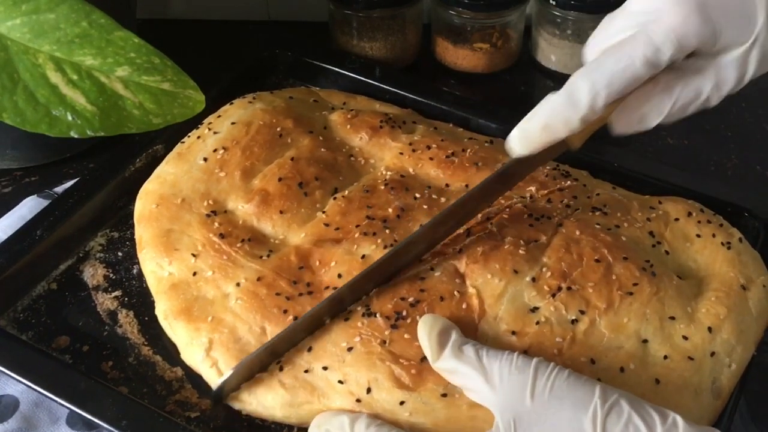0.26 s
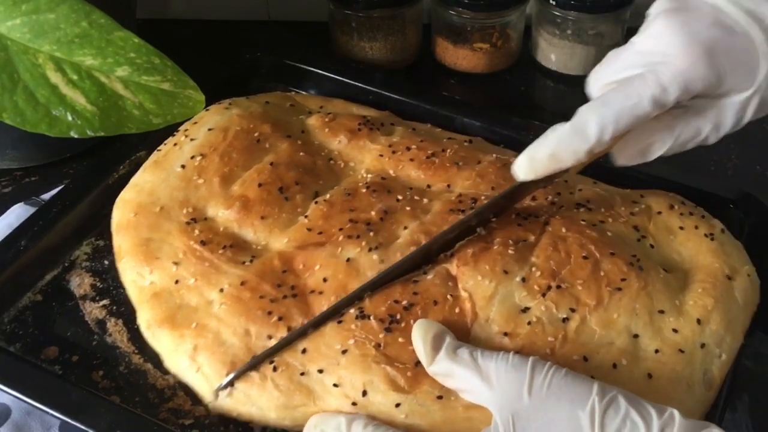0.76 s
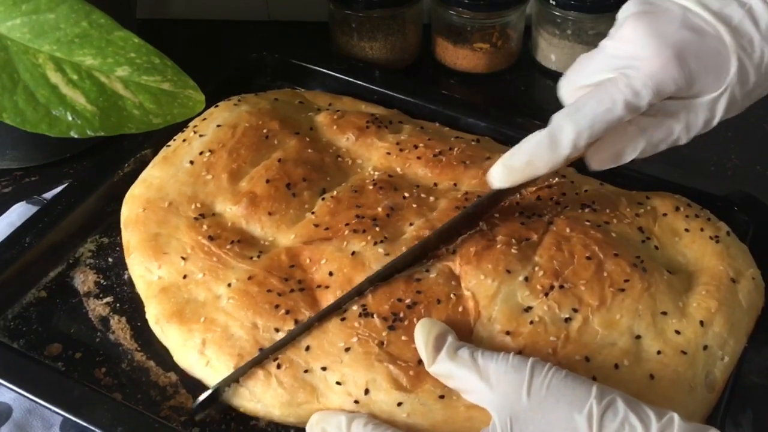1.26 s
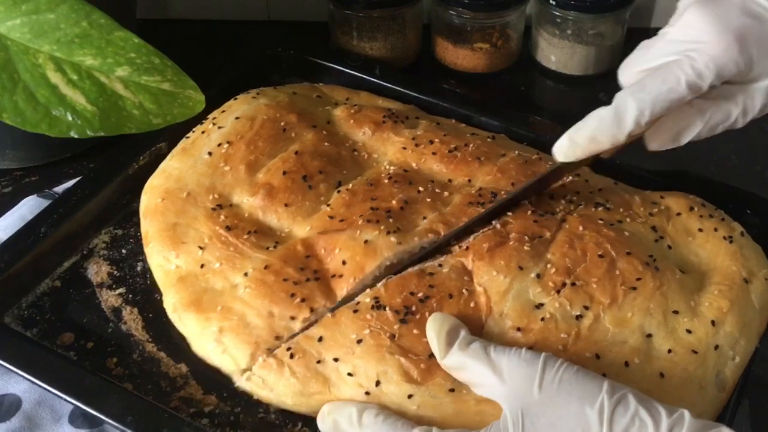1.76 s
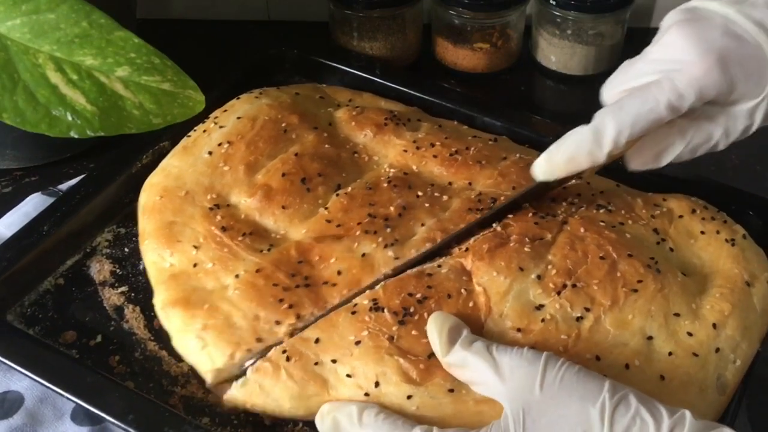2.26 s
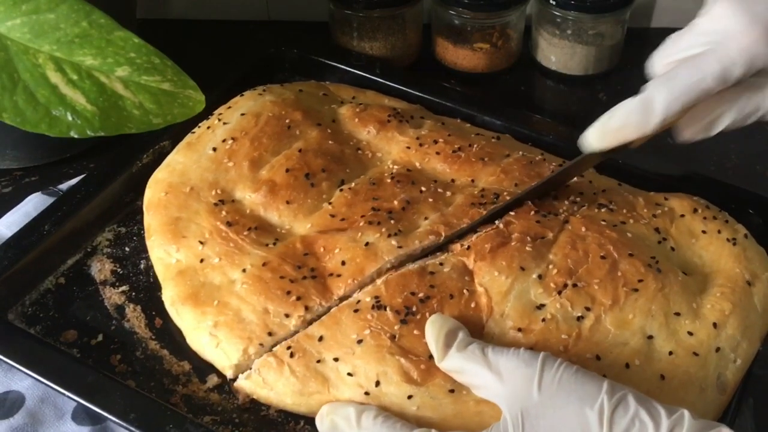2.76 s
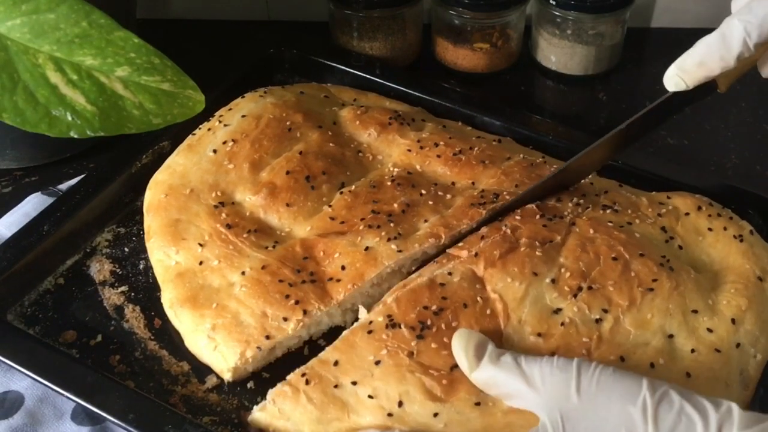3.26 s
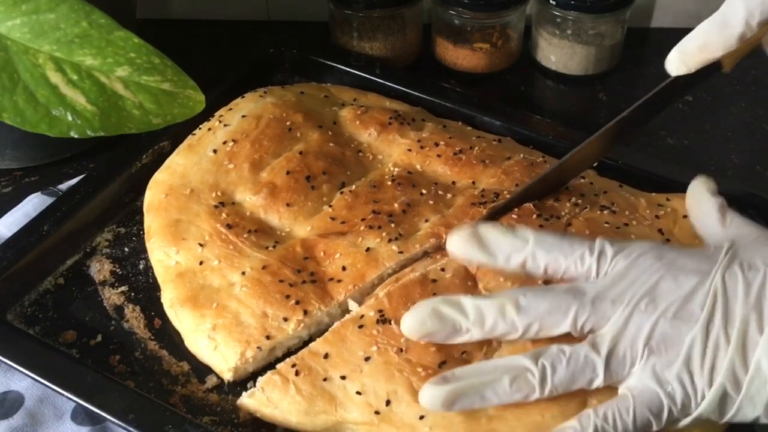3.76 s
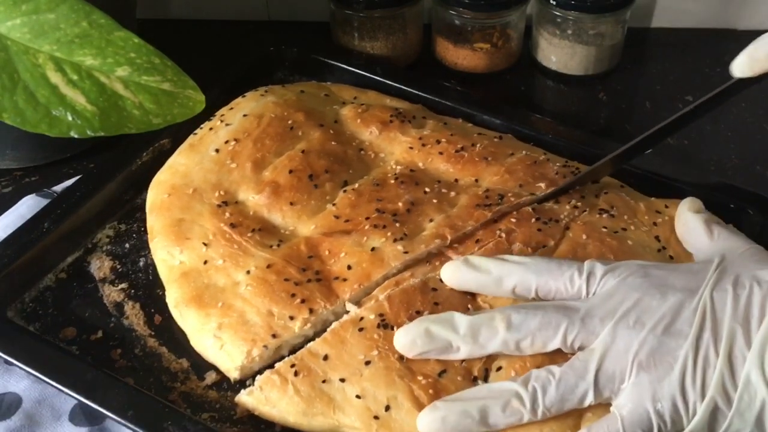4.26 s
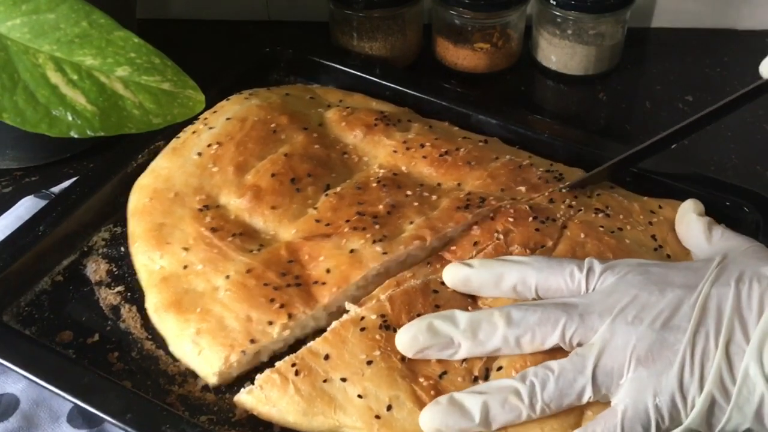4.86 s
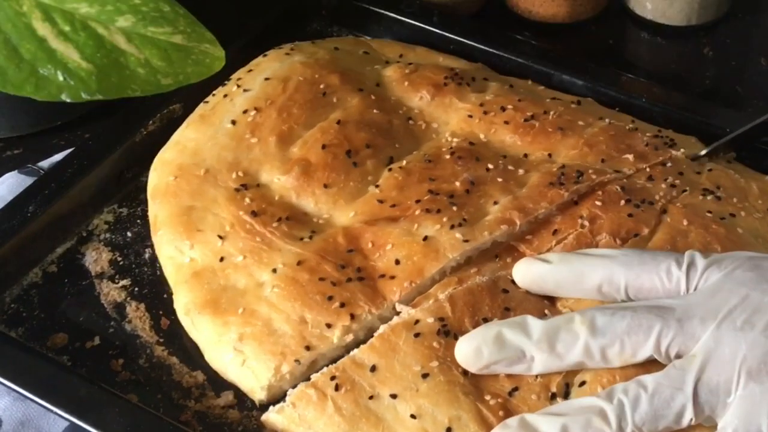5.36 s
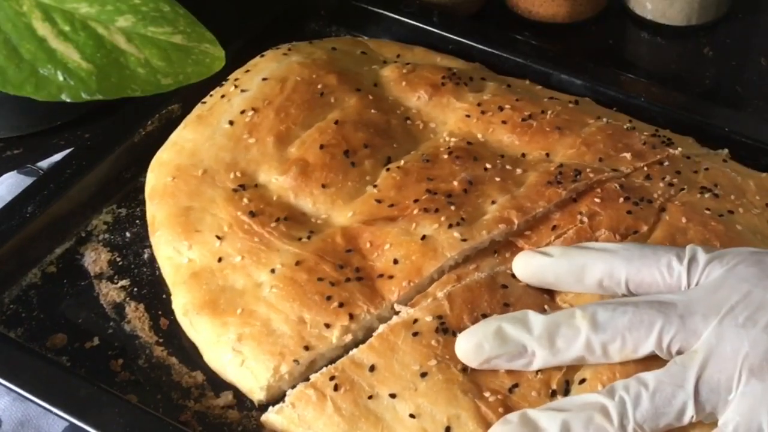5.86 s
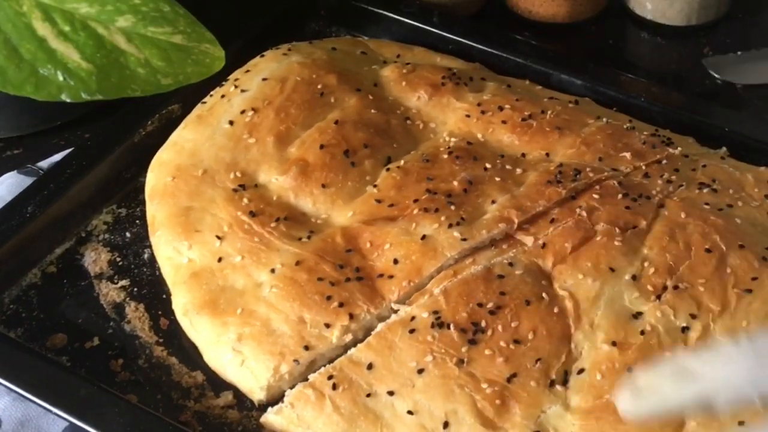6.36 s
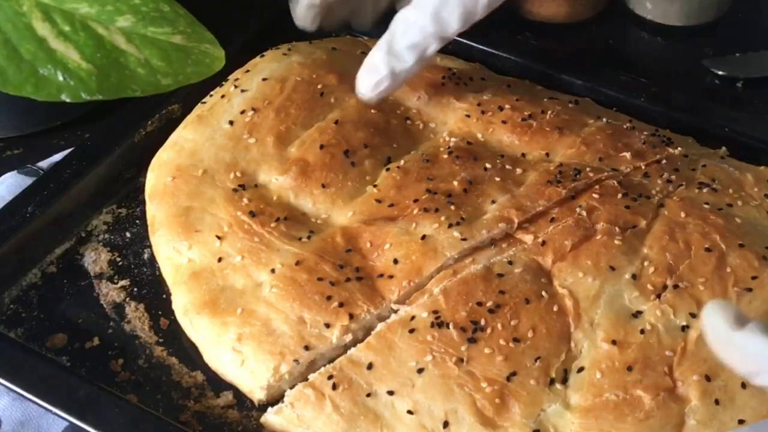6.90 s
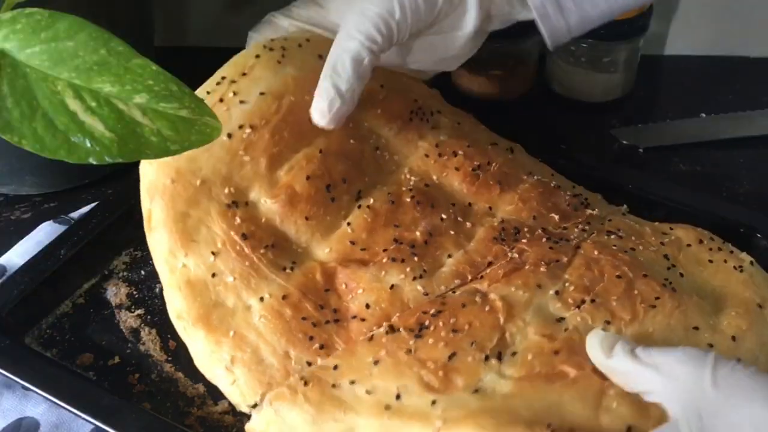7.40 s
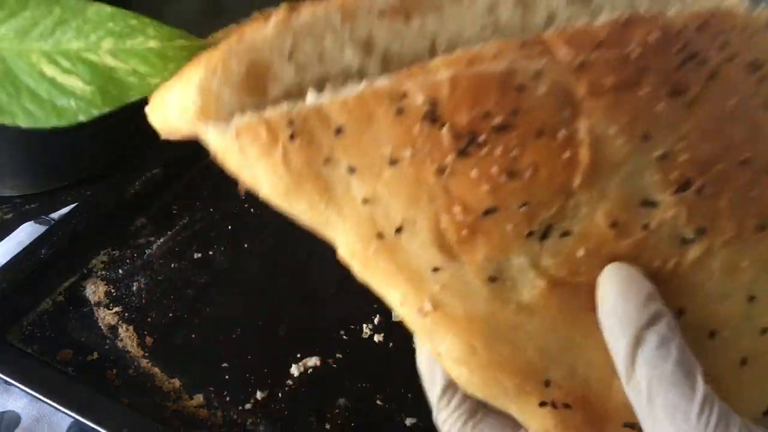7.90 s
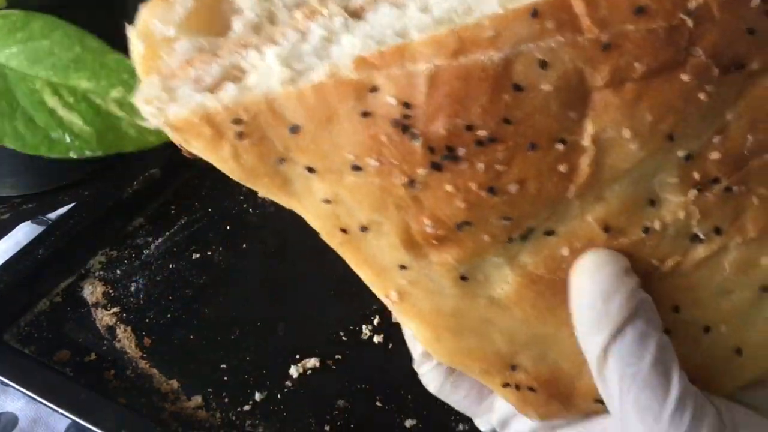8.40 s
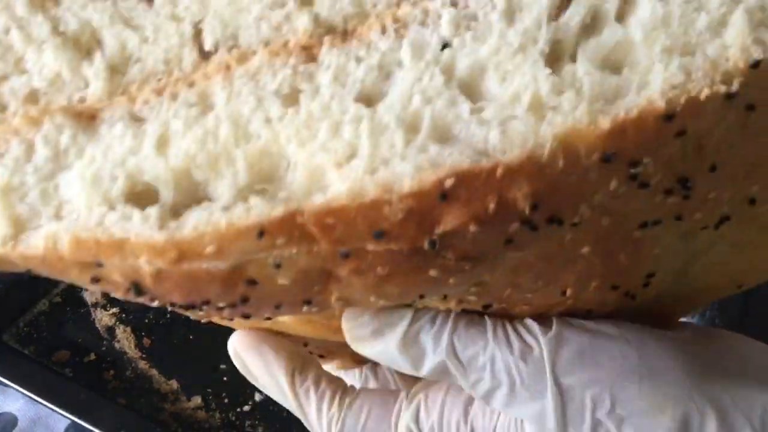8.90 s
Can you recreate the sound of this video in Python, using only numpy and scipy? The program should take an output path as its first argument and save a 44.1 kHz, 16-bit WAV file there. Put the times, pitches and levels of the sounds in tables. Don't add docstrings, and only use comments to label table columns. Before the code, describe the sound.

Close in a quiet kitchen, a serrated knife rasps softly through crusty flatbread with small crust snaps. Two loud cracks come as the blade breaks through, then a louder one as the thick rim gives. Its teeth chatter rapidly on the metal tray, the knife clatters onto the counter with a short steel ring, and only faint crumb and glove ticks remain over a low fridge hum.

```python
import sys
import numpy as np
from scipy import signal
from scipy.fft import rfft, irfft, next_fast_len
from scipy.io import wavfile
from scipy.ndimage import uniform_filter1d

SR = 44100
rng = np.random.default_rng(int(sys.argv[2]) if len(sys.argv) > 2 else 0)


def to_wav(sig):
    pcm = np.clip(np.atleast_2d(sig), -1, 1) * 32767
    pcm = np.round(pcm).astype(np.int16)
    wavfile.write(sys.argv[1], SR, pcm.T)


def undo_db(level):
    steps = np.asarray(level, float) / 20
    return 10 ** steps


N = 403074

# pitch_hz, density_db
AIR_COLOUR = [(21, -35), (35, 5), (70, -4.5), (98, -20.5), (123, -5), (151, -10), (245, -16.5),
              (309, -11.5), (443, -21.5), (650, -15.5), (840, -19.5), (1440, -19.5), (2950, -33),
              (12700, -45.5), (16000, -48)]
AIR_DB = -58
# time_s, level_db
ROOM_WASH = [(0, -8.5), (2.5, -5), (3.5, -2.5), (6, 2.5), (7.8, -1.5), (8.1, -3.5)]
# peak_s, swell_s, ease_s, level_db
MOTOR_THROBS = [(.3, .5, 0.45, -51.5), (1.55, 0.5, 0.99, -50), (2.3, 0.16, 0.26, -50),
                (2.8, 0.29, 0.29, -47), (3.55, 0.44, 0.29, -47.5), (4.1, 0.23, 0.19, -43),
                (4.65, 0.21, 0.4, -42), (5.3, 0.17, 0.2, -46), (6.85, 0.22, 0.23, -53)]
MOTOR_HZ, MOTOR_REST_DB = 66.3, -62.5
# time_s, level_db
TABLE_RUMBLE = [(0, -61), (4.3, -58), (4.7, -50), (5.2, -61), (6.1, -50), (7, -58), (8, -49.5), (9.14, -55)]
TABLE_HZ = 55.7
HUM_OVERTONES_DB = [-12, -28, -18]
HUM_HZ, HUM_DB = 100.6, -54.5

# pitch_hz, t60_s
ROOM_DECAY = [(300, 0.24), (1000, 0.48), (3000, 0.27), (8000, 0.23), (15000, 0.3)]
ROOM_TURN_S = 0.11
# start_s, level_db
AFTERMATH = [
    (2.0885, -31.5),
    (2.493, -36.5),
    (4.254, -25.5),
]
# pitch_hz, density_db
AFTERMATH_COLOUR = [(400, -12), (900, -5), (2200, -2), (3400, -5), (4500, -16.5), (8000, -22), (15000, -39)]
EARLY_T60_S, LATE_T60_S, LATE_DB = 0.066, 0.51, -16

# start_s, peak_db, pitch_hz
TICKS = [(0.113, -57, 12500), (.725, -60, 13000), (1.178, -40.5, 3600), (2.031, -51.5, 3680),
         (2.204, -52, 4000), (2.232, -44, 13000), (2.241, -41.5, 6740), (1.287, -51, 9000),
         (1.501, -51, 9030), (1.8682, -44.5, 9000), (2.381, -43, 3100), (2.4658, -48, 4350),
         (2.5755, -58, 3180), (2.732, -55, 3620), (2.7716, -46, 3630), (3.3974, -57, 5180),
         (4.834, -40, 3110), (2.2877, -49, 3090), (3.0087, -52, 4340), (3.359, -56, 3870),
         (3.482, -46, 3730), (3.529, -42.5, 3060), (4.0495, -56, 3110), (4.816, -45, 3920),
         (6.799, -44, 5400), (6.964, -41, 4440), (7.0393, -40.5, 4300), (7.17, -43, 12900),
              (7.218, -59, 13100), (7.3345, -71, 3450), (7.35, -46, 12900), (7.3695, -54, 6200),
              (7.422, -44.5, 3100), (7.478, -47, 6070), (7.534, -52, 8890), (7.699, -52, 7000),
              (7.7167, -40.5, 4240), (7.889, -54, 4100), (8.0463, -54, 13000), (8.085, -49.5, 11200),
              (8.123, -54, 12000), (8.491, -47, 12000), (8.525, -49, 12000), (8.5866, -52, 5500),
              (8.9435, -44, 12800), (7.6181, -59, 3000), (7.675, -60, 3280), (7.825, -59, 5000),
              (8.0092, -56, 3000), (8.6118, -57.5, 4420), (8.644, -47.5, 3560), (8.8145, -52, 11000),
              (8.9196, -60, 8900), (9.016, -59, 12000), (6.075, -59, 3500)]
# pitch_hz, density_db
SCUFF_COLOUR = [(1000, -29), (3000, -0.5), (6000, 2.5), (10500, 1.5), (14000, 2)]

# start_s, peak_db, strongest_hz
BOUNCES = [(6.115, -28, 2070), (6.12, -31.5, 3400), (6.1418, -35, 3430), (6.146, -41, 6800),
           (6.163, -38, 6800), (6.17, -44, 3420), (6.186, -41, 6800), (6.2044, -46.5, 3430),
           (6.2194, -43.5, 3430), (6.2654, -48, 4000), (6.28, -43, 12000), (6.3386, -15, 2070),
           (6.3402, -14.5, 13900), (6.349, -17.5, 5940), (6.351, -24.5, 2070), (6.48, -34.5, 5870),
           (6.5079, -30, 5920), (6.514, -35, 4290), (6.529, -36.5, 3750), (6.534, -31, 4230),
           (6.544, -29.5, 4960), (6.5573, -35, 3950), (6.564, -37, 2100), (6.5751, -31.5, 5900),
           (6.6094, -38.5, 5450), (6.615, -42, 12000), (6.6554, -45, 14000), (6.6697, -46, 13400)]
# pitch_hz, width_hz, level_db
BLADE_MODES = [(1500, 110, -9), (2070, 50, -5), (2660, 55, -4), (3430, 58, -4), (4240, 90, -9),
               (5080, 110, -4), (5860, 86, -5.5), (6820, 100, -6), (8800, 150, -8), (10000, 160, -6),
               (11840, 170, -1), (13200, 300, 1), (14200, 300, 0), (15000, 300, -2)]
BLADE_SPOT_DB = 2.5
# start_s, pitch_hz, level_db, t60_s
SINGING = [(1.187, 4500, -50, 0.094), (1.187, 1750, -47, .05), (1.187, 3630, -50, .04),
           (1.545, 1750, -50, .05), (6.145, 2680, -46.5, .06), (2.108, 3190, -45, 0.27),
           (2.51, 3200, -52, .12), (5.728, 6450, -41, .08), (6.116, 3440, -46, 0.08),
           (6.116, 2645, -43, 0.092), (6.116, 1550, -44, 0.06), (6.116, 2050, -51, 0.034),
           (6.341, 2107, -45, 0.22), (6.341, 4300, -52, 0.28), (6.35, 5850, -43, 0.17),
           (6.53, 2070, -47, 0.14), (6.566, 2070, -47, 0.078)]
SINGING_BEAT_HZ, SINGING_PAIR_GAIN = 38, 0.4

# start_s, peak_db, crack_db, strongest_hz
SNAPS = [(0.0034, -43, -13, 1740), (1.1857, -29.5, -15, 2430), (1.1915, -40, -15, 1430),
         (1.5312, -38.5, -7, 2350), (1.5414, -39, -19, 1750), (1.549, -46, -24, 1750),
         (1.9165, -42, -17, 2450), (1.926, -37, -29, 2450), (1.936, -35.5, -26, 2440),
         (1.946, -51, -30, 1800), (1.9689, -43, -22, 2420), (3.7954, -46, -16, 2630),
         (4.8454, -35.5, -21, 1750), (2.468, -40, -25, 3030), (2.2406, -44.5, -25, 1750),
         (7.6982, -52, -19, 1270)]
SNAP_SLIP_MS = 8.3
# start_s, peak_db, crack_db, strongest_hz, slip_ms
BREAKS = [
    (2.0876, -12.5, -20.5, 3190, 1.8),
    (2.4918, -14, -19, 2100, 1.7),
]
# start_s, peak_db, crack_db, strongest_hz, slip_ms
RIM_BREAK = [
    (4.2528, -9.5, -14, 2130, 3),
]
# start_s, peak_db, crack_db, strongest_hz, slip_ms
CHATTER = [(4.975, -10.5, -11.5, 2290, 3.4), (4.9795, -15, -32, 2400, 5.2), (4.9937, -10.5, -23, 2523, 4.9),
           (4.999, -17, -26.5, 3300, 5), (5.0116, -13, -20, 2560, 6.5), (5.0298, -12.5, -20, 2600, 6.9),
           (5.0486, -11, -21, 2654, 6), (5.1305, -30, -37.5, 2570, 7), (5.1388, -18.5, -18, 1500, 3.8),
           (5.3169, -11, -20, 3210, 5), (5.3278, -9, -29, 2580, 7.5), (5.3462, -11.5, -23, 2650, 5),
           (5.3575, -19.5, -34.5, 2590, 5), (5.3702, -9.5, -22, 2600, 5), (5.3905, -24.5, -36.5, 2000, 3),
           (5.3979, -12, -16.5, 3100, 5.9), (5.4115, -17.5, -31, 2700, 2.3), (5.4395, -18, -20, 1500, 3.4),
           (5.4912, -21.5, -21, 2300, 2.63), (5.5005, -31, -31.5, 2600, 5.8), (5.5114, -13, -21, 2300, 4.4),
           (5.5224, -19, -20.5, 2260, 8), (5.5407, -33.5, -21.5, 1100, 6), (5.6065, -18, -29, 3090, 4),
           (5.631, -16, -36.5, 1330, 3.2), (5.6378, -10, -16.5, 3100, 4.88), (5.651, -16, -41, 2550, 11),
           (5.661, -6, -17, 2650, 5.7), (5.6815, -11.5, -23.5, 3120, 6.3), (5.7005, -11, -15, 1370, 5),
           (5.711, -20.5, -28, 1370, 12), (5.7266, -18.5, -27, 3100, 6), (5.733, -19, -16, 3100, 14),
           (5.7619, -17.5, -17.5, 2900, 2.5)]
# pitch_hz, width_hz, level_db
CRUST_MODES = [(1002, 160, -16), (1270, 180, 2), (1750, 110, 0), (1900, 62, 1.5), (2100, 130, -1),
               (2440, 120, 5), (2570, 62, -0.5), (3110, 140, -6.5), (3620, 120, -5.5), (3860, 180, -10),
               (4500, 110, -10.5), (5520, 150, -17), (2800, 3600, 4.5)]
# pitch_hz, width_hz, level_db
BREAK_MODES = [(1294, 60, -10.5), (1750, 240, -6), (2100, 96, 1), (2542, 81, 4), (3190, 69, -1),
               (3650, 110, -8), (3870, 120, -9), (4360, 200, -14), (4540, 180, -11), (4890, 170, -11),
               (5380, 110, -10), (650, 87, -12.5), (2600, 2100, 5)]
# pitch_hz, width_hz, level_db
RIM_MODES = [(770, 83, -9), (1400, 75, 1), (1100, 73, -12), (2130, 100, 8.5), (2560, 100, 1),
             (2950, 84, -4.5), (3190, 120, 6), (1750, 250, 0), (3920, 130, -3), (4290, 150, -12),
             (5070, 150, -8), (5530, 140, -6), (2600, 2500, 10)]
# pitch_hz, width_hz, level_db
TRAY_MODES = [(1174, 65, -3.5), (1384, 62, -1), (1772, 223, 7.5), (2160, 230, 2), (2237, 55, -3),
              (2560, 105, 5.5), (2920, 990, 10.5), (3097, 110, 5.5), (3750, 130, -4), (4120, 270, 0),
              (4500, 530, -1.5), (5150, 260, -5.5), (6430, 180, -18.5), (2600, 3600, 0)]
# pitch_hz, width_hz, level_db
LOAF_MODES = [(382, 33, -4.5), (652, 65, 2.5), (906, 140, -0.5)]
# pitch_hz, width_hz, level_db
TRAY_LOW_MODES = [(371, 41, -1.5), (930, 215, 4)]
# pitch_hz, density_db
CRACK_COLOUR = [(2500, -9), (4500, -3), (7000, -5), (9500, -7.5), (11000, -12), (14500, -15)]
SLIP_BUILD = 0.16
SLIP_SQUARENESS = 2.4
PRESS_DETUNE = 0.012

# peak_s, swell_s, ease_s, effort_db, coarse_grit_db
STROKES = [(.115, 0.027, 0.043, -67, 2), (.152, .015, 0.018, -69.5, 7), (.415, 0.022, .03, -70, -12),
           (.95, .04, 0.031, -83, -10), (1.69, 0.059, 0.053, -63.5, 4), (.29, 0.062, 0.081, -65, -15),
           (.47, 0.043, 0.063, -57, -10), (.6, 0.059, 0.11, -58.5, -10), (.79, 0.077, 0.069, -59.5, -5),
           (1.13, 0.069, 0.091, -65.5, -17), (1.31, 0.081, 0.13, -64, 2.5),
           (1.505, 0.076, 0.095, -63.5, -6), (1.61, 0.05, 0.093, -63.5, -4),
           (1.81, 0.036, 0.071, -68.5, -16), (1.875, 0.056, 0.053, -61, -6), (1.92, 0.042, 0.043, -53, -3),
           (1.99, 0.033, 0.046, -59.5, -4), (2.03, 0.016, 0.057, -40.5, 0.5), (2.3, 0.027, 0.024, -57.5, 6),
           (2.42, 0.079, 0.11, -53, 2.5), (2.64, 0.14, 0.058, -58, 2), (2.84, 0.13, 0.086, -51, -1.5),
           (3.01, 0.012, 0.061, -58, 3),
           (3.51, 0.055, 0.1, -61.5, -0.5), (3.801, 0.037, 0.023, -61.5, 13.5), (4.06, 0.017, 0.054, -69, 12),
        (4.19, 0.054, 0.04, -70, 6.5), (4.42, 0.089, 0.08, -61.5, 4), (4.54, 0.064, 0.056, -62, 5),
        (4.815, 0.008, 0.026, -58.5, 8.5), (4.85, 0.029, 0.041, -55, 6), (4.96, 0.054, 0.054, -63.5, 7),
        (5.16, 0.018, 0.062, -56.5, 11.5), (5.235, 0.034, .04, -76, 22.5),
        (5.29, 0.038, 0.031, -59.5, 16.5), (5.73, 0.053, 0.032, -40.5, -3), (5.82, 0.031, 0.2, -69, 16),
        (6.98, 0.033, 0.05, -58, 0), (7.41, 0.022, 0.045, -66, -16), (7.46, 0.059, 0.09, -58.5, -0.5),
        (7.7, 0.026, 0.031, -72, 9), (8.68, 0.13, 0.15, -60.5, -2.5), (8.955, .012, 0.032, -70, -3),
        (9.0, .5, .5, -80, -1), (8.25, .25, .25, -71, -5.5), (8.052, 0.0065, 0.025, -61, -12),
        (8.128, .006, 0.025, -66, -10), (8.495, 0.0068, .03, -58, -3), (6.17, .06, 0.1, -64.5, 6)]
STROKE_ENDS_DB, STROKE_ROUNDNESS = -23.5, 1.9
# time_s, level_db
WHISTLE = [(0, -10), (.45, 0), (.65, -17), (.8, -25), (.95, 1), (1.13, -2), (1.25, -18), (1.5, -38),
           (1.8, -38.5)]
WHISTLE_HZ, WHISTLE_WIDTH_HZ, WHISTLE_REST_DB = 12560, 90, -85
# pitch_hz, density_db
FIZZ_COLOUR = [(1500, -19), (3000, 1.5), (4500, 1), (6500, -0.5), (9000, 0), (10500, -5), (12000, -4.5),
               (15500, -7.5)]
# pitch_hz, density_db
GRIT_COLOUR = [(500, -19), (900, 1), (1500, 1), (2500, 1), (3800, -7.5), (5000, -13.5), (8000, -27.5)]

# centre_s, half_width_s, deepest_db
SCENE_CHANGES = [
    (5.199, 0.028, -32),
    (7.034, 0.035, -41),
    (7.865, 0.032, -18),
]
# pitch_hz, level_db
MICROPHONE = [(25, -45), (45, -4), (60, 0), (9800, 0), (10500, -2.5), (11200, 0), (15700, 0), (15950, -24),
              (16600, -30), (16750, -70)]


def evened(x):
    return x / np.sqrt(np.mean(x ** 2) + 1e-20)


def curve(rows):
    s, *columns = np.transpose(rows)
    return [np.interp(np.arange(N) / SR, s, c, c[0], c[-1]) for c in columns]


def read(points, hz):
    f, value = np.transpose(points)
    return np.interp(np.log(hz + 1), np.log(f + 1), value)


def coloured(x, spectrum):
    size = next_fast_len(len(x) + 2048)
    gain = undo_db(read(spectrum, np.fft.rfftfreq(size, 1 / SR)))
    return irfft(rfft(x, size) * gain, size)[:len(x)]


def resonate(x, hz, width_hz):
    r = np.exp(-np.pi * width_hz / SR)
    return 2 * signal.lfilter([1 - r], [1, -r * np.exp(2j * np.pi * hz / SR)], x).real


def resonate_twice(x, hz, width_hz):
    return resonate(resonate(x, hz, width_hz), hz, width_hz)


def add(mix, s, sound):
    part = mix[max(round(s * SR), 0):][:len(sound)]
    part += sound[:len(part)]


def swells(rows):
    s, rise, fall, db = np.array(rows).T[:4, :, None]
    late = np.arange(0, N / SR + .01, .001) - s
    far = np.where(late < 0, -late / rise, late / fall)
    return undo_db(db + STROKE_ENDS_DB * far ** STROKE_ROUNDNESS)


def sampled(ms_values):
    return np.interp(np.arange(N) * 1000 / SR, np.arange(len(ms_values)), ms_values)


def air():
    noise = coloured(rng.standard_normal(N), AIR_COLOUR)
    noise = undo_db(AIR_DB + 2.5) * noise / np.std(coloured(noise, [(110, -60.0), (125, 1.5)]))
    noise = coloured(noise, [(30, -6.5), (110, -2.0), (130, 0)])
    hiss = coloured(noise, [(2500, -30), (4500, 0)])
    wash_db, = curve(ROOM_WASH)
    noise = noise + (undo_db(0.44 * wash_db) - 1) * hiss
    return noise + (undo_db(wash_db) - 1) * resonate(noise, 1450, 900)


def table_rumble():
    level_db, = curve(TABLE_RUMBLE)
    return undo_db(level_db) * evened(resonate_twice(rng.standard_normal(N), TABLE_HZ, 20.9))


def motor():
    throb = sampled(swells(MOTOR_THROBS).sum(0)) + undo_db(MOTOR_REST_DB)
    rough = evened(resonate_twice(rng.standard_normal(N), MOTOR_HZ, 4.6))
    tone = np.sin(2 * np.pi * MOTOR_HZ * np.arange(N) / SR)
    return throb * (0.16 * rough + 0.83 * tone)


def fridge():
    phase_drift = evened(uniform_filter1d(rng.standard_normal(N), 4000))
    level_drift = evened(uniform_filter1d(rng.standard_normal(N), 6000))
    turn = 2 * np.pi * HUM_HZ * np.arange(N) / SR + 0.683 * phase_drift
    overtones = sum(undo_db(g) * np.sin((k + 2) * turn) for k, g in enumerate(HUM_OVERTONES_DB))
    return undo_db(HUM_DB + 2.5 + 3.06 * level_drift) * (np.sin(turn) + overtones)


def tail(x, stretch):
    taps = np.zeros(SR // 2)
    at = np.arange(300, len(taps) - 20, 20)
    taps[at + rng.integers(0, 20, len(at))] = rng.choice([-1., 1.], len(at))
    hz, t, z = signal.stft(taps, SR, nperseg=256)
    fall = undo_db(-60 * t / (stretch * read(ROOM_DECAY, hz)[:, None]))
    taps = signal.istft(z * fall, SR, nperseg=256)[1]
    return signal.fftconvolve(x, taps / np.linalg.norm(taps))[:N]


def room(x, stretch):
    turn = np.pi * np.arange(N) / SR / ROOM_TURN_S
    return sum(tail(x * np.sqrt(2 / 3) * np.cos(turn + k * np.pi / 3), stretch) for k in range(3))


def aftermath():
    out, t = np.zeros(N), np.arange(SR // 2) / SR
    fall = undo_db(-60 * t / EARLY_T60_S) + undo_db(LATE_DB - 60 * t / LATE_T60_S)
    onset = np.minimum(t / 0.001, 1)
    for s, db in AFTERMATH:
        wash = evened(coloured(rng.standard_normal(len(t)), AFTERMATH_COLOUR))
        add(out, s, undo_db(db) * wash * fall * onset)
    return out


def ticks():
    out, t = np.zeros(N), np.arange(900) / SR
    for s, db, hz in TICKS:
        burst = coloured(rng.standard_normal(len(t)) * undo_db(-60 * t / .02), SCUFF_COLOUR)
        snap = burst + 5 * resonate_twice(burst, hz, .45 * hz)
        add(out, s, undo_db(db + 3.0) * snap / abs(snap).max())
    return out


def slip(noise, length_s, blow):
    t = np.arange(len(noise)) / SR
    build = 1 - np.exp(-t / (SLIP_BUILD * length_s))
    hold = np.exp(-(t / length_s) ** SLIP_SQUARENESS) * build
    return noise * hold + blow * np.sqrt(length_s * SR) * (t == 0)


def body(drive, modes, extra_db, edge_hz):
    ring = np.zeros(len(drive))
    for k, ((hz, width_hz, db), extra) in enumerate(zip(modes, extra_db)):
        mode = evened(resonate(drive, hz, width_hz)) / np.sqrt(width_hz)
        ring += (-1) ** k * undo_db(db + extra) * mode
    ring = signal.sosfilt(signal.butter(2, edge_hz, "band", fs=SR, output="sos"), ring)
    return ring / abs(ring).max()


def nearness(modes, hz, spread):
    return np.exp(-(np.log(np.array(modes)[:, 0] / hz) / spread) ** 2)


def clatter():
    out, t = np.zeros(N), np.arange(6000) / SR
    for s, db, top_hz in BOUNCES:
        noise = rng.standard_normal(len(t))
        spot_db = BLADE_SPOT_DB * rng.standard_normal(len(BLADE_MODES))
        extra_db = spot_db + 10.0 * nearness(BLADE_MODES, top_hz, 0.14)
        ring = body(slip(noise, 0.00028, blow=0.76), BLADE_MODES, extra_db, (1200, 16000))
        scuff = coloured(noise * undo_db(-60 * t / 0.02), SCUFF_COLOUR)
        knock = resonate(noise * undo_db(-60 * t / 0.11), 1330, 1800)
        sound = ring + undo_db(-0.5) * scuff / abs(scuff).max()
        sound = sound + undo_db(0.064 * db - 9.5) * knock / abs(knock).max()
        add(out, s - .0005, undo_db(db - 4.0) * sound)
    return out


def singing():
    out, t = np.zeros(N), np.arange(SR // 2) / SR
    for s, hz, db, t60_s in SINGING:
        partner = np.sin(2 * np.pi * (hz - SINGING_BEAT_HZ) * t)
        pair = np.sin(2 * np.pi * hz * t) + SINGING_PAIR_GAIN * partner
        add(out, s, undo_db(db - 60 * t / t60_s) * pair)
    return out


def catches(rows, modes, low_modes, blow, low_db, detune, focus_db, rise_s, spot_db):
    out, t = np.zeros(N), np.arange(7000) / SR
    closing = 1 - np.exp(-(t / rise_s) ** 2)
    for s, db, bright_db, top_hz, slip_ms in rows:
        slip_noise, crack_noise = rng.standard_normal((2, len(t)))
        spot, press = rng.standard_normal((2, len(modes)))
        drive = slip(slip_noise, slip_ms / 1000, blow)
        pressed = [(f * (1 + PRESS_DETUNE * detune * d), w, g) for (f, w, g), d in zip(modes, press)]
        extra_db = spot_db * spot
        ring = body(drive, pressed, extra_db + focus_db * nearness(modes, top_hz, 0.11), (600, 6500))
        thud = body(drive, low_modes, extra_db, (300, 1100))
        crack = coloured(crack_noise * undo_db(-60 * t / 0.029), CRACK_COLOUR)
        sound = ring + undo_db(low_db) * thud + undo_db(bright_db + 5.5) * crack / abs(crack).max()
        sound = sound * closing
        add(out, s - .0007, undo_db(db) * sound / abs(sound).max())
    return out


def grains(per_s):
    size = undo_db(4.0 * np.minimum(rng.exponential(1, N), 4))
    return size * rng.choice([-1., 1.], N) * (rng.random(N) < per_s / SR)


def patchy(x, depth_db):
    z = signal.stft(x, nperseg=256)[2]
    patches = uniform_filter1d(rng.standard_normal(z.shape), size=2, axis=0)
    patches = uniform_filter1d(patches, size=13, axis=1)
    return signal.istft(z * undo_db(depth_db * evened(patches)), nperseg=256)[1][:N]


def rasp():
    rows = STROKES
    each = swells(rows)
    effort = sampled(each.sum(0))
    coarse = sampled(undo_db(np.array(rows)[:, -1]) @ each)
    fizz = evened(patchy(coloured(grains(4000), FIZZ_COLOUR), depth_db=3.8))
    snaps = grains(4000)
    crust = evened(body(snaps, CRUST_MODES, np.zeros(len(CRUST_MODES)), (900, 5000)))
    grit = evened(evened(coloured(snaps, GRIT_COLOUR)) + undo_db(-13.5) * crust)
    grit = evened(patchy(grit, depth_db=3.0))
    whistle_db, = curve(WHISTLE)
    whistle = evened(resonate_twice(grains(400), WHISTLE_HZ, WHISTLE_WIDTH_HZ))
    whistle = (effort + undo_db(WHISTLE_REST_DB)) * undo_db(whistle_db) * whistle
    return effort * fizz + whistle + coarse * grit


def scene():
    kitchen = air() + table_rumble() + motor() + fridge()
    crumbs, knife = ticks(), clatter()
    snaps = catches([(*row, SNAP_SLIP_MS) for row in SNAPS], CRUST_MODES, LOAF_MODES, blow=0.52,
                    low_db=-16.0, detune=1, focus_db=4.0, rise_s=0.00049, spot_db=1.5)
    breaks = catches(BREAKS, BREAK_MODES, LOAF_MODES, blow=1.1,
                     low_db=-28.0, detune=0, focus_db=7.5, rise_s=0.0017, spot_db=0)
    rim = catches(RIM_BREAK, RIM_MODES, LOAF_MODES, blow=1.2,
                  low_db=-26.5, detune=0, focus_db=0, rise_s=0.0011, spot_db=0)
    chatter = catches(CHATTER, TRAY_MODES, TRAY_LOW_MODES, blow=0.59,
                      low_db=-28.5, detune=1, focus_db=4.0, rise_s=0.0012, spot_db=0.93)
    far = room(undo_db(-12.5) * snaps + undo_db(-11.0) * chatter + undo_db(-8.0) * crumbs, stretch=0.83)
    far_hard = room(undo_db(-10.0) * knife + undo_db(-19.0) * breaks + undo_db(-15.0) * rim, stretch=1.7)
    close = snaps + breaks + rim + chatter + knife + crumbs + singing() + rasp()
    return (kitchen + far + far_hard + aftermath() + close)[None]


def roll_off(x):
    return signal.sosfilt(signal.butter(12, 16640, fs=SR, output="sos"), x)


def record(dry):
    t = np.arange(N) / SR
    dips = [np.clip(abs(t - s) / half_s, undo_db(db), 1) for s, half_s, db in SCENE_CHANGES]
    mix = coloured(dry[0], MICROPHONE)[None] * np.prod(dips, axis=0)
    return roll_off(mix)


dry = scene()
out = record(dry)
to_wav(out)
```